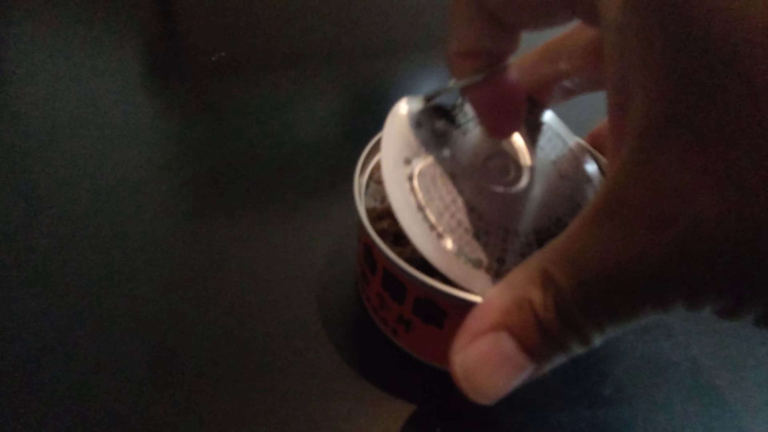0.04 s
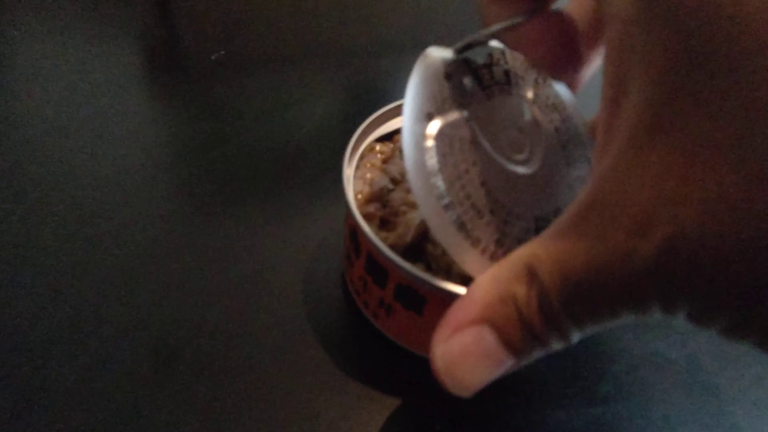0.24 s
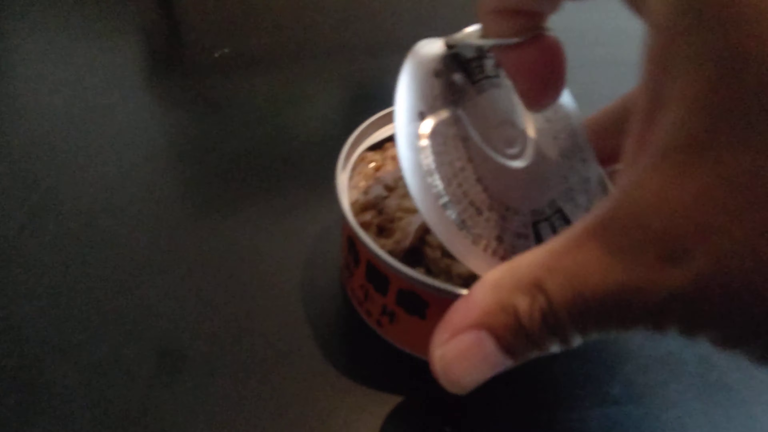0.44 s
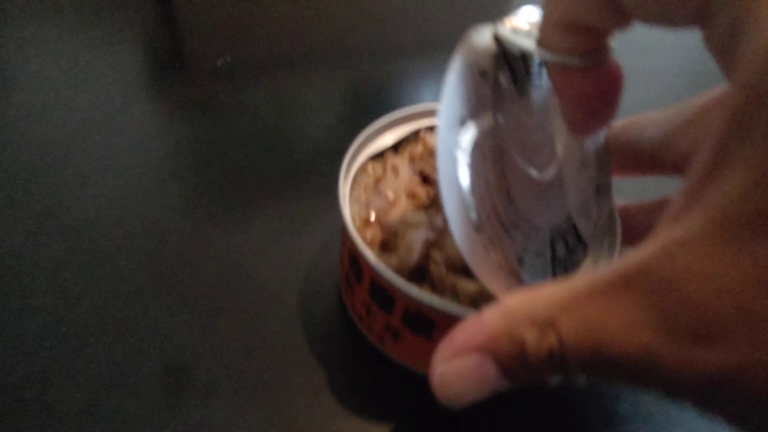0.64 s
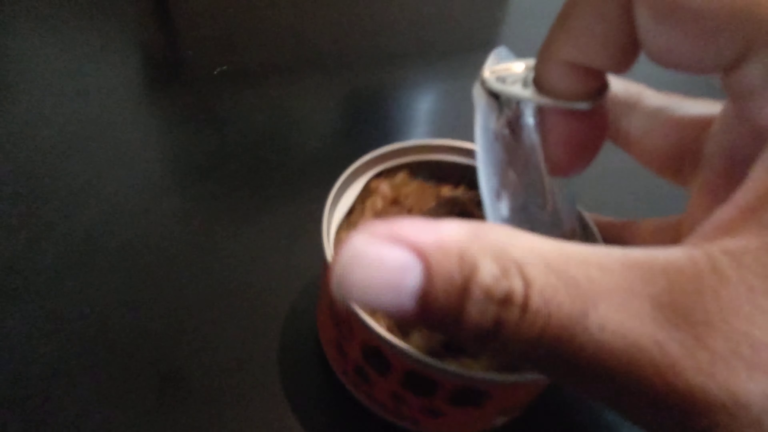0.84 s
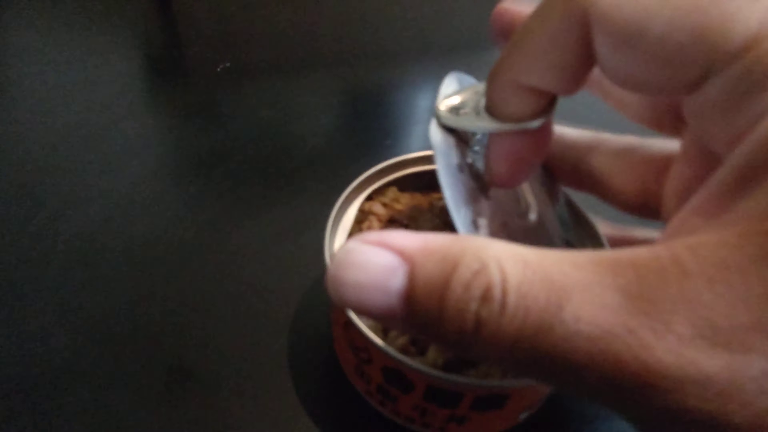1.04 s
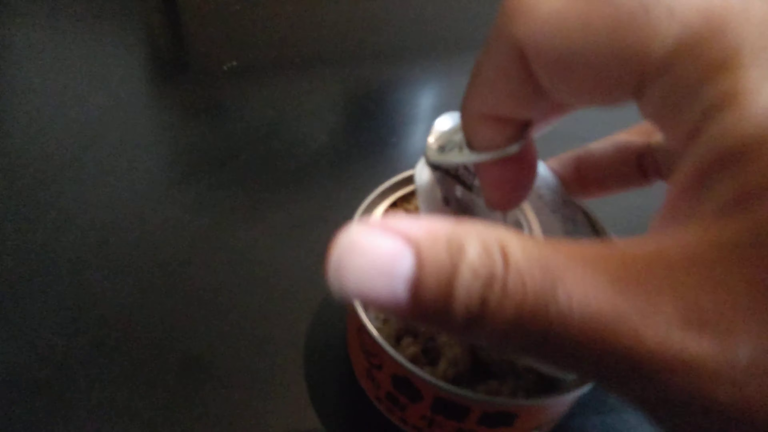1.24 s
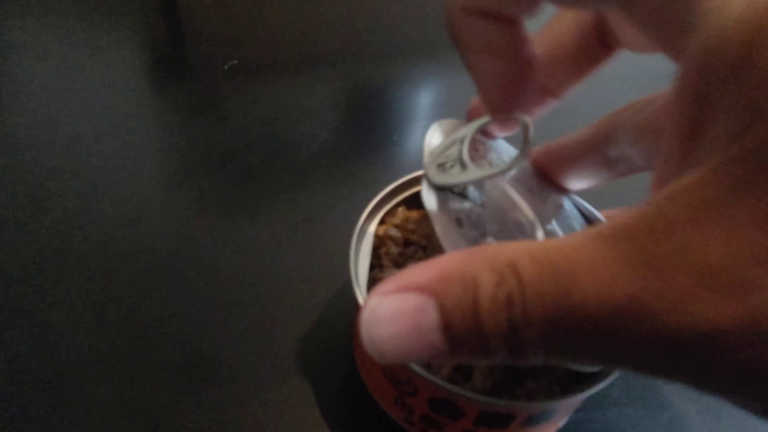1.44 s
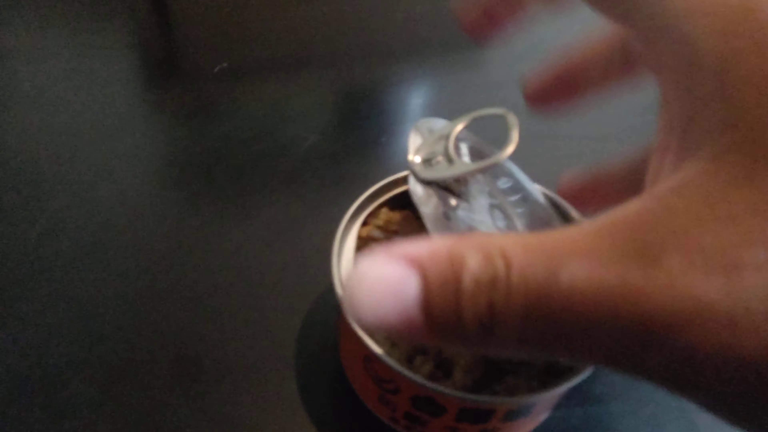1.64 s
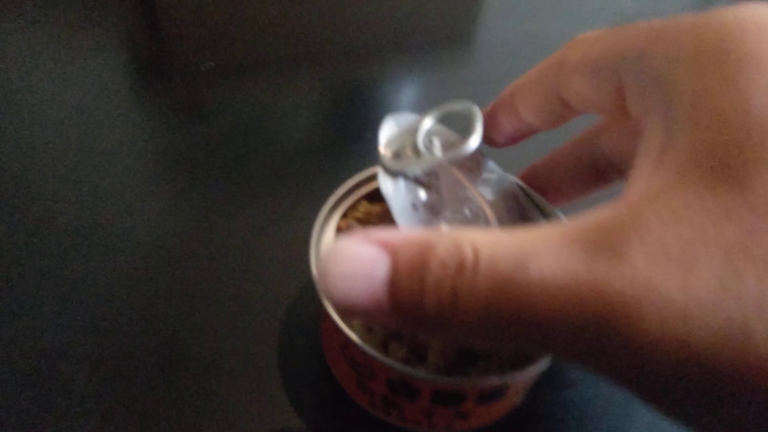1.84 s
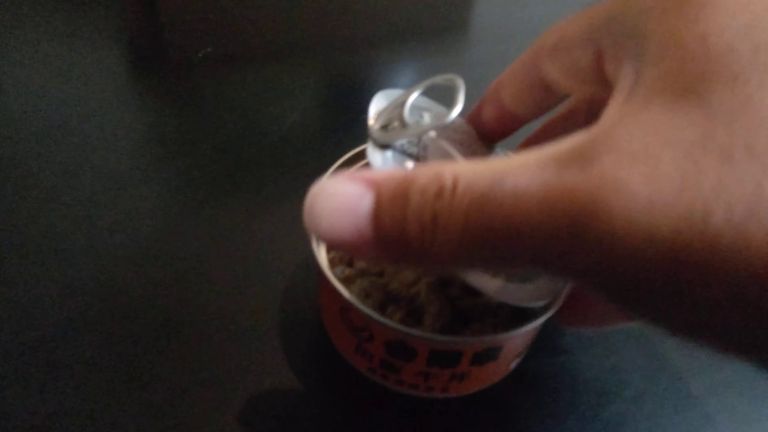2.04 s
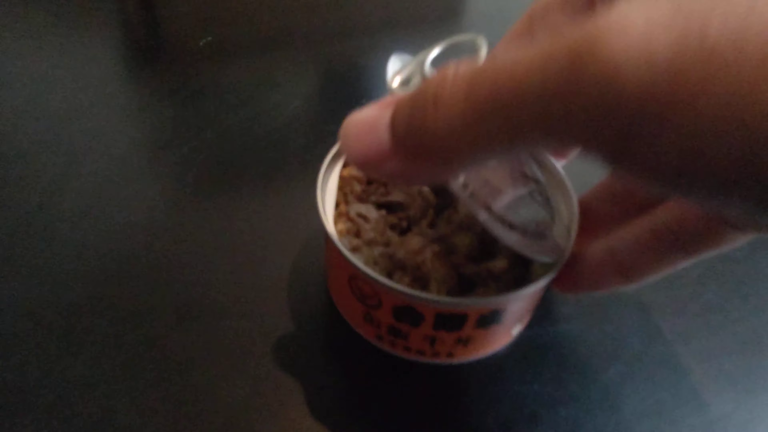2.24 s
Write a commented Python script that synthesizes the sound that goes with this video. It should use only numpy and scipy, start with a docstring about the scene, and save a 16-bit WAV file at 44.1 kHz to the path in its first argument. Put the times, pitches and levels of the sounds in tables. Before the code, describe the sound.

A small can's thin metal lid peels back with sharp cracks, clacks and light scrapes.

```python
"""The thin lid of a small food can is peeled back by its ring, close by, in a quiet, faintly humming room.
First the scored seam tears in a run of sharp cracks, and the lid buckles with a loud, duller clack.
At about one second it buckles again, more softly. Fainter cracks follow as its edge scrapes along the
rim and the bent metal rings with clear pings, while fingers keep bumping the can.
Near two seconds a fingernail ticks, and a last ping and scrape die away."""
import sys
import numpy as np
from scipy import signal
from scipy.fft import rfft, irfft
from scipy.io import wavfile
from scipy.ndimage import uniform_filter1d

SR = 44100
rng = np.random.default_rng(int(sys.argv[2]) if len(sys.argv) > 2 else 0)


def unload_wav(signal):
    """Save mono or channel-first audio to the path in sys.argv[1] as 16-bit WAV at rate SR, clipped to [-1, 1]."""
    wavfile.write(
        sys.argv[1],
        SR,
        np.round(np.clip(np.atleast_2d(signal).T, -1, 1) * 32767).astype(np.int16),
    )


N = 101429

# In the tables, pan_db is left minus right, and t60_s is the time a sound takes to fade by 60 dB.
# Tone colours, each a curve of gain over pitch: pitch_hz, gain_db
BACKGROUND_COLOUR = [(15, -1.5), (35, 0.5), (50, -19), (64, 1), (80, -9.5), (120, -15), (200, -10),
                     (280, -9.5), (420, -16.5), (600, -21.5), (1000, -21), (2000, -25.5), (3800, -27),
                     (7000, -34.5), (14000, -33.5)]
ECHO_COLOUR = [(60, -23), (300, 4.5), (1200, -1), (3000, -2), (8000, 0.5), (14000, -5.5)]
RUMBLE_COLOUR = [(15, -7.5), (35, 9.5), (80, -7.5), (130, -11), (300, -33), (1000, -57)]
NAIL_COLOUR = [(100, -26), (1500, -20), (2600, -7), (4000, 5.5), (5500, -9), (8000, -19), (14000, -21.5)]
SCRAPE_COLOUR = [(100, -9), (700, -13), (2000, 2), (2800, -6.5), (3600, 5), (6000, -12.5), (9000, -10),
                 (14000, -8)]
BUCKLE_COLOUR = [(40, -46), (90, -12), (170, 3.5), (270, -16), (540, -5), (720, -16), (1000, 1.5),
                 (1500, -0.5), (2300, -6.5), (3300, -16), (7000, -31.5), (14000, -38)]
CRACK_COLOUR = [(40, -8.5), (200, -15.5), (700, -15), (1200, -4), (1600, 0), (2200, 5.5), (2750, -4),
                (3450, 1), (4400, -2), (6300, -5.5), (8200, -4), (13500, -7.5)]
# The natural notes (modes) of the lid and of the can: pitch_hz, relative_db, t60_s
LID_MODES = [(1577, -4, 0.09), (2092, 3.5, 0.15), (2174, -17.5, 0.067), (2345, -15, 0.37), (3340, -2, 0.13),
             (3420, -4, 0.078), (3985, -7.5, 0.075), (4570, 1, .08), (5600, -2, 0.12), (6100, -17, 0.2),
             (7900, -9, 0.083), (9650, 1, 0.087), (12700, -11, .06)]
CAN_MODES = [(149, -5, 0.11), (532, -13, 0.14), (1080, 3.5, 0.13), (1200, -5.5, 0.15), (1330, -12, .2),
             (1410, -18, .16), (1566, -2.5, 0.11), (1624, -5, .1), (2130, -15, .25), (2410, -22, 0.34)]
# The hand shifts the can on the table: peak_s, width_s, level_db
RUMBLES = [(.16, 0.048, -52), (.40, 0.066, -49.5), (1.11, .04, -52.5)]
# The can bumps against fingers and table: start_s, level_db, pitch_hz, pan_db
BUMPS = [(0.3924, -30.5, 141, -10), (.5440, -41, 137, 23), (0.728, -40.5, 206, 15), (1.0750, -40.5, 225, 4),
         (1.433, -45, 222, -1), (1.4530, -50, 170, 0), (1.9377, -42, 224, 27)]
# The lid's edge rubs along the rim: peak_s, swell_s, fade_s, level_db, bass_db, pan_db
SCRAPES = [(0.301, .03, 0.035, -44.5, -10, 2), (.382, 0.022, 0.024, -40, 2, 0),
           (.593, 0.014, 0.0079, -43, 1, 17), (.725, 0.0098, 0.013, -59, 18, 18),
           (0.791, 0.021, 0.015, -55.5, -21, 18), (.897, 0.0032, 0.02, -50.5, -16, 12),
           (1.067, 0.019, 0.011, -53.5, 19, 2), (1.176, 0.032, 0.024, -56.5, 16, 11),
           (1.267, 0.0087, 0.0097, -41.5, 1, 16), (1.305, 0.012, 0.0078, -50, 2, 9),
           (1.409, 0.035, 0.017, -53, 16.5, 11), (1.458, 0.015, 0.018, -45.5, 16, 10),
           (1.555, 0.011, 0.013, -59, -5, 12), (1.633, 0.0048, 0.011, -48, 9.5, 7),
           (1.802, 0.011, 0.021, -56.5, -5, 11), (2.028, 0.011, 0.0082, -50, -3, 14),
           (2.15, 0.056, 0.085, -64, -1, 19)]
# Notes that the bent lid rings on with: start_s, pitch_hz, level_db, t60_s, pan_db
PINGS = [(.2470, 8100, -30, 0.1, -3), (.2470, 1577, -36.5, .08, -5), (0.265, 3985, -36, 0.099, -7),
         (.2880, 515, -30, 0.044, -23), (.3572, 2345, -36.5, 0.087, 6), (.5740, 402, -43, 0.046, -23),
         (0.575, 4570, -32, 0.029, 10), (0.6073, 431, -44, 0.054, -22), (0.6058, 1550, -42.5, 0.06, -4),
         (.2560, 2050, -40.5, 0.36, 0), (.3120, 3340, -29.5, 0.031, 4), (.3120, 2213, -34, 0.12, 16),
         (.7980, 3270, -43.5, 0.039, 18), (.7980, 4090, -36.5, 0.024, 16), (1.0280, 2430, -68, 0.095, 10),
         (1.0280, 3354, -37.5, 0.034, 18), (1.1785, 3570, -42, 0.013, 19), (1.1785, 1593, -30.5, 0.016, 19),
         (1.1785, 2193, -30.5, 0.019, 12), (1.2685, 3327, -35.5, 0.13, 28), (1.6330, 3720, -42, .1, 25),
         (1.6330, 2445, -50, 0.095, 12), (1.7680, 2420, -66, 0.19, 7), (2.0280, 642, -54.5, 0.21, 15),
         (2.0280, 2170, -52.5, 0.071, 16), (2.0280, 4160, -51, .06, 21)]
# The lid buckles: start_s, level_db, bass_db, treble_db, pan_db
BUCKLES = [(.2880, -33.5, -10, -3, -15), (.3921, -17.5, -2, 5.5, 0.5), (1.0722, -33, 3.5, 5, 15),
           (1.0755, -27.5, -6, 2, 9), (1.1035, -34.5, -7, -0.5, 12)]
# The seam cracks: start_s, level_db, bass_db, treble_db, pan_db
CRACKS = [(.1227, -54, 6, -7.5, 8), (.2466, -25, -5.5, -1, 7), (.2556, -23.5, 11, 7, 0),
          (.2636, -26, -1, -0.5, 4), (.2820, -27, 4.5, -4, 3.5), (.3117, -25, 10.5, 3, 2.5),
          (.3175, -27.5, 4.5, -8, -3), (.3572, -25.5, 3.5, 6.5, 2.5), (.5470, -51, 7, -5, 25),
          (.5735, -26, 2.5, 4.5, 3.5), (.6060, -26.5, 6, 6.5, -1), (.7976, -40, -8, -3.5, 9.5),
          (1.0276, -39, -27, -8.5, 11), (1.1710, -44.5, 9, -5, 10), (1.1784, -32, -2, -11.5, 12.5),
          (1.2301, -49.5, -3, -13, 12), (1.2671, -40, -0.5, -9.5, 10), (1.3020, -47.5, -6, -5, 11),
          (1.5045, -55, 15, -8, 11), (1.6327, -41.5, 4, -11.5, 15), (1.7679, -51.5, -15, -21, 8),
          (2.0263, -53, -7, -2, 9)]

BASS_HZ, TREBLE_HZ = 1300, 5230  # bass_db acts below the first, treble_db above the second
SIZE = 16384  # samples in one short sound
T = np.arange(SIZE) / SR  # its time axis, in seconds
HZ, SCENE_HZ = np.fft.rfftfreq(SIZE, 1 / SR), np.fft.rfftfreq(N, 1 / SR)
BASS_BAND = 1 / (1 + (HZ / BASS_HZ) ** 4)
TREBLE_BAND = 1 - 1 / (1 + (HZ / TREBLE_HZ) ** 4)


def gain(db):
    """Turns decibels into a number to multiply by."""
    return 10 ** (np.asarray(db) / 20)


def pan(pan_db):
    """Left and right gains that keep the total power the same."""
    sides = gain(np.array([[.5], [-.5]]) * pan_db)
    return sides / np.sqrt(np.mean(sides ** 2, axis=0))


def fade(t60_s):
    """A decay that falls by 60 dB in t60_s."""
    return np.exp(-np.log(1000) * T / t60_s)


def at_level(sound, level_db):
    """Sets the level of a short sound as if all its energy fell within 10 ms."""
    return sound * gain(level_db) / np.sqrt(np.mean(np.sum(sound ** 2, axis=-1)) / (SR / 100))


def add(out, start_s, sound):
    """Mixes a short sound into the scene."""
    start = int(start_s * SR)
    out[:, start:start + SIZE] += sound[:, :N - start]


def curve(points, hz=HZ):
    """Joins the points of a tone colour into a gain in dB at every frequency."""
    pitch_hz, gain_db = np.array(points, float).T
    return np.interp(np.log(hz + 1), np.log(pitch_hz), gain_db)


def colour(sound, gain_db):
    """Filters a short sound so that no ringing comes before its start (minimum phase)."""
    cepstrum = irfft(np.log(gain(gain_db)), SIZE)
    cepstrum[..., 1:SIZE // 2] *= 2
    cepstrum[..., SIZE // 2 + 1:] = 0
    return irfft(rfft(sound) * np.exp(rfft(cepstrum)), SIZE)


def stereo_noise(right_lag_s=.0002, treble_shared=0.39):
    """Noise at two microphone openings: shared in the bass, partly separate above, later on the right."""
    noise = rfft(rng.standard_normal((3, SIZE)))
    separate = (1 - treble_shared) * HZ ** 2 / (HZ ** 2 + 400 ** 2)
    common = noise[2] * np.exp(-2j * np.pi * HZ * np.array([[0], [right_lag_s]]))
    return irfft(np.sqrt(1 - separate) * common + np.sqrt(separate) * noise[:2], SIZE)


def room_noise(level_db=-58, pan_db=1.5):
    """A low room rumble, mostly shared by both sides, with a faint separate hiss on each."""
    noise = rfft(rng.standard_normal((3, N)))
    shared = 0.89 / (1 + (SCENE_HZ / 600) ** 2)
    spectrum = np.sqrt(shared) * noise[2] + np.sqrt(1 - shared) * noise[:2]
    air = irfft(spectrum * gain(curve(BACKGROUND_COLOUR, SCENE_HZ)), N)
    return air / air.std() * gain(level_db) * pan(pan_db)


def room_hum(pitch_hz=63.3, width_hz=3.1, level_db=-66.5):
    """A faint low drone, which wavers because it is a very narrow band of noise."""
    band = np.exp(-((SCENE_HZ - pitch_hz) / width_hz) ** 2)
    drone = irfft(rfft(rng.standard_normal(N)) * band, N)
    return gain(level_db) * drone / drone.std()


def room_echo(sound, t60_s=0.25, build_s=0.013):
    """The walls of a small room send the sound back as a short, smooth tail."""
    build_up = 1 - np.exp(-(T / build_s) ** 2)
    tail = colour(rng.standard_normal((2, SIZE)) * fade(t60_s) * build_up, curve(ECHO_COLOUR))
    tail *= gain(-17) / np.sqrt(np.sum(tail ** 2) / 2)
    blended = sound + 0.42 * sound[::-1]  # each side also gets some of the other
    return signal.fftconvolve(blended, tail, axes=1)[:, :N]


def can_shifts():
    """The hand shifts the can on the table, making low swells of rumble."""
    time_s = np.arange(N) / SR
    rumble = irfft(rfft(rng.standard_normal(N)) * gain(curve(RUMBLE_COLOUR, SCENE_HZ)), N)
    swells = sum(gain(level_db) * np.exp(-((time_s - peak_s) / width_s) ** 2 / 2)
                 for peak_s, width_s, level_db in RUMBLES)
    return rumble / rumble.std() * swells


def finger_taps():
    """The can bumps on fingers and table, each thud about one cycle long, and a nail ticks once."""
    out = np.zeros((2, N))
    for start_s, level_db, pitch_hz, pan_db in BUMPS:
        thud = T * fade(0.0059) * np.sin(2 * np.pi * pitch_hz * T)
        add(out, start_s, pan(pan_db) * at_level(thud, level_db))
    tick = colour(signal.unit_impulse(SIZE), curve(NAIL_COLOUR))
    add(out, start_s=1.9595, sound=pan(38) * at_level(tick, level_db=-43.5))
    return out


def sheet_ripple(depth_db=3):
    """The bent sheet's close, shifting resonances: random peaks and dips in dB, weaker below 2 kHz."""
    ripple = rng.standard_normal(len(HZ))
    ripple = uniform_filter1d(uniform_filter1d(ripple, size=70), size=70)
    return depth_db * ripple / ripple.std() * np.minimum(HZ / 2000, 1)


def rim_scrapes(grain_db=2.5):
    """The lid's edge sticks and slips on the rim, making grainy noise that swells and fades."""
    out = np.zeros((2, N))
    from_peak_s = T - T[-1] / 2
    for peak_s, swell_s, fade_s, level_db, bass_db, pan_db in SCRAPES:
        grains = gain(grain_db * np.repeat(rng.standard_normal(SIZE // 64), 64))
        rub = colour(stereo_noise() * grains, curve(SCRAPE_COLOUR) + bass_db * BASS_BAND + sheet_ripple())
        width_s = np.where(from_peak_s < 0, swell_s, fade_s)
        swell = np.exp(-(from_peak_s / width_s) ** 2 / 2)
        add(out, peak_s + from_peak_s[0], rub / rub.std() * swell * gain(level_db) * pan(pan_db))
    return out


def lid_pings():
    """The thin lid rings on with clear notes, different ones as it bends."""
    out = np.zeros((2, N))
    for start_s, pitch_hz, level_db, t60_s, pan_db in PINGS:
        note = np.sqrt(2) * np.sin(2 * np.pi * pitch_hz * T)
        add(out, start_s, gain(level_db) * pan(pan_db) * fade(t60_s) * note)
    return out


def metal_ring(modes):
    """The metal's natural notes die away, a little different each time as the sheet bends."""
    out = 0
    for pitch_hz, relative_db, t60_s in modes:
        level_shift, pitch_shift = rng.standard_normal(2)
        phase = rng.uniform(0, 2 * np.pi, (2, 1))
        note = np.sin(2 * np.pi * pitch_hz * (1 + 0.006 * pitch_shift) * T + phase)
        out = out + gain(relative_db + 4.2 * level_shift) * fade(t60_s) * note
    return out / np.sqrt(np.mean(out[:, :SR // 100] ** 2))  # strength 1 over the first 10 ms


def metal_snaps(events, tone_colour, modes, rise_s, t60_s, ring_db, bass_pan_db):
    """Each sudden slip shakes the sheet: most of its notes die at once as noise, and a few ring on."""
    out = np.zeros((2, N))
    attack = 1 - np.exp(-T / rise_s)
    for start_s, level_db, bass_db, treble_db, pan_db in events:
        burst = stereo_noise() * attack * fade(t60_s)
        power = uniform_filter1d(abs(rfft(burst)) ** 2, size=400, axis=-1)
        flatten_db = -10 * np.log10(power + 1e-9)  # evens out the noise's broad chance peaks
        burst = colour(burst, flatten_db + curve(tone_colour) + sheet_ripple())
        snap = at_level(burst, 0) + gain(ring_db) * attack * metal_ring(modes)
        sides_db = 20 * np.log10(pan(pan_db + bass_pan_db * BASS_BAND))
        snap = colour(snap, bass_db * BASS_BAND + treble_db * TREBLE_BAND + sides_db)
        add(out, start_s, at_level(snap, level_db))
    return out


def lid_buckles():
    """The lid suddenly gives way with dull clacks that set the can ringing."""
    return metal_snaps(BUCKLES, BUCKLE_COLOUR, CAN_MODES,
                       rise_s=0.00074, t60_s=0.035, ring_db=-9, bass_pan_db=-9)


def seam_cracks():
    """The scored seam tears in sharp cracks that set the lid ringing."""
    return metal_snaps(CRACKS, CRACK_COLOUR, LID_MODES,
                       rise_s=0.00026, t60_s=0.026, ring_db=-16, bass_pan_db=-12.5)


def scene():
    """Mixes the metal and its echo with the handling sounds and the quiet room."""
    metal = seam_cracks() + lid_buckles() + lid_pings() + rim_scrapes()
    return metal + room_echo(metal) + finger_taps() + can_shifts() + room_noise() + room_hum()


def record(dry):
    """Steeply cuts the highest treble, above 14.4 kHz."""
    return signal.sosfilt(signal.butter(14, 14400, fs=SR, output="sos"), dry)


dry = scene()
out = record(dry)
unload_wav(out)
```